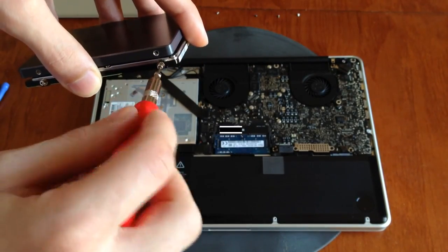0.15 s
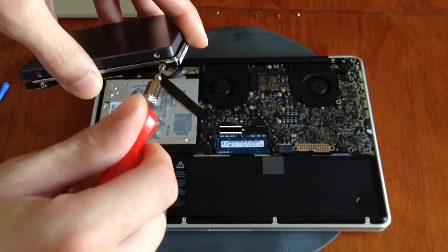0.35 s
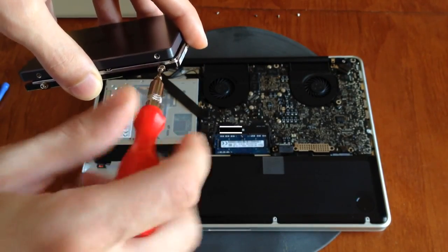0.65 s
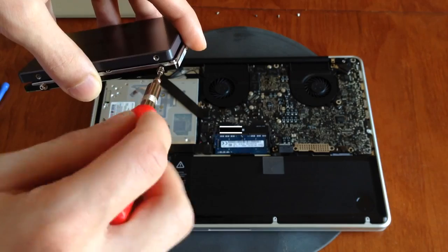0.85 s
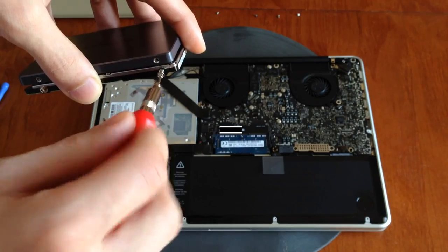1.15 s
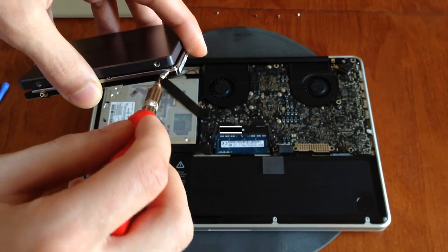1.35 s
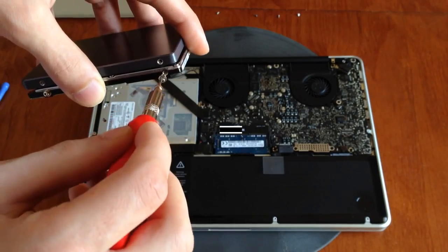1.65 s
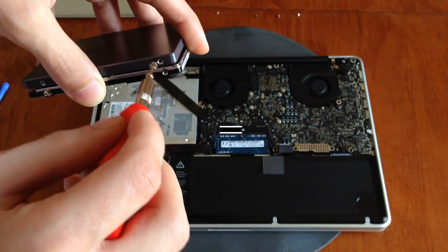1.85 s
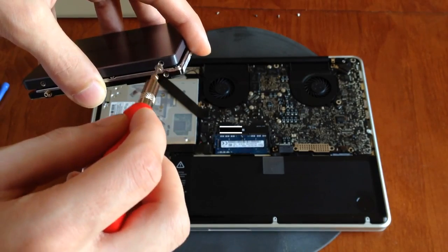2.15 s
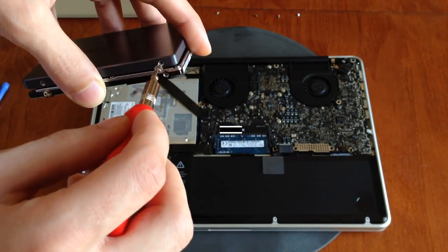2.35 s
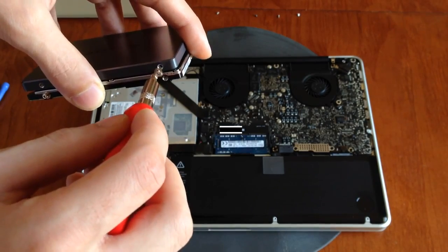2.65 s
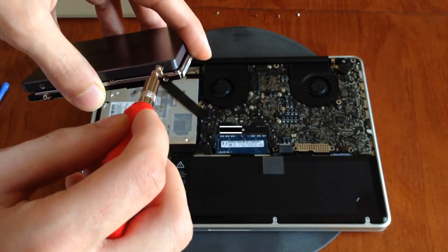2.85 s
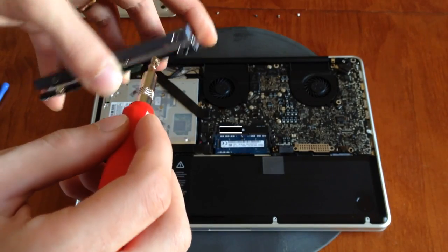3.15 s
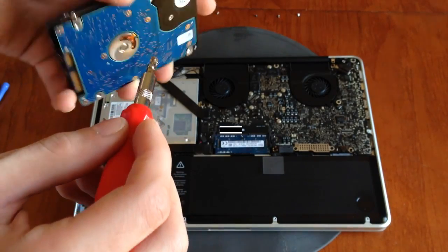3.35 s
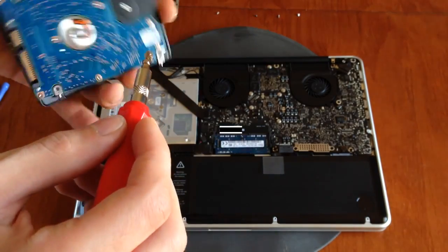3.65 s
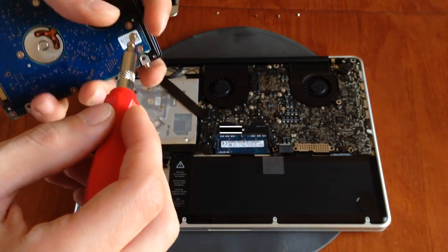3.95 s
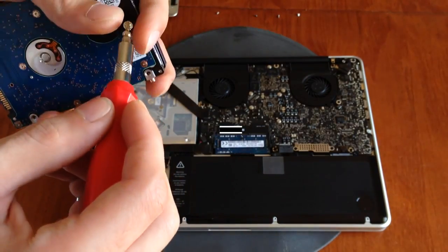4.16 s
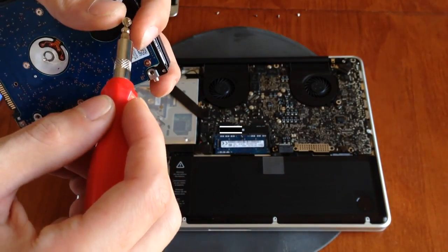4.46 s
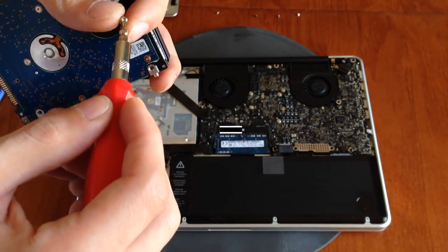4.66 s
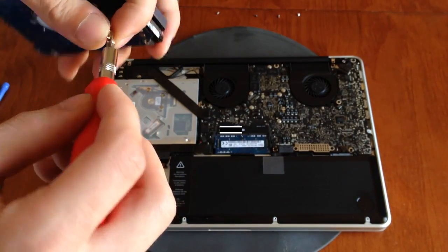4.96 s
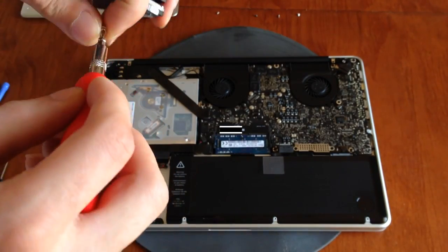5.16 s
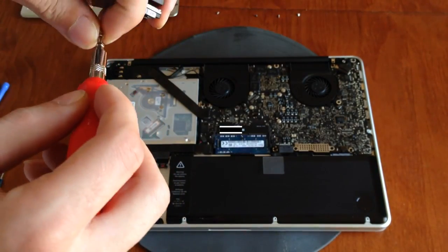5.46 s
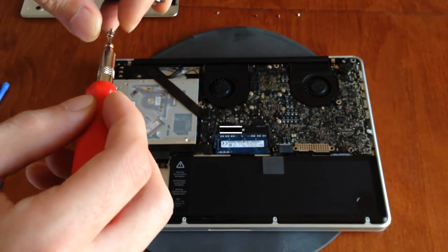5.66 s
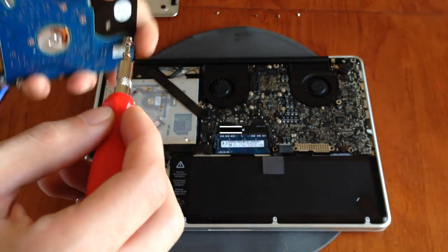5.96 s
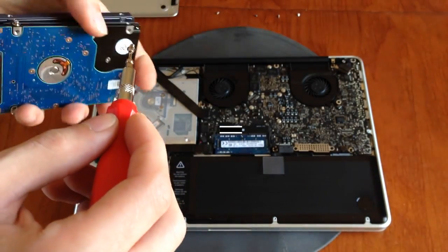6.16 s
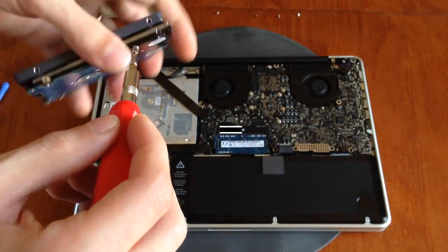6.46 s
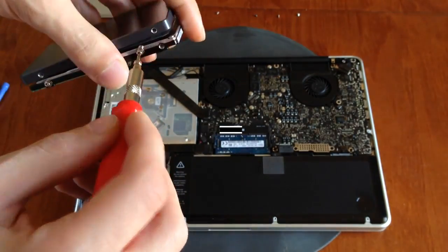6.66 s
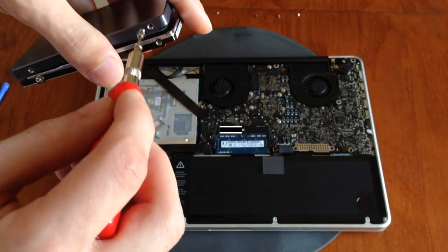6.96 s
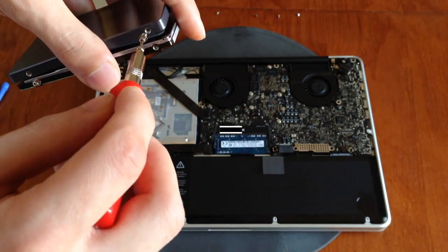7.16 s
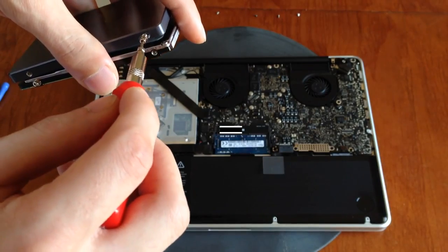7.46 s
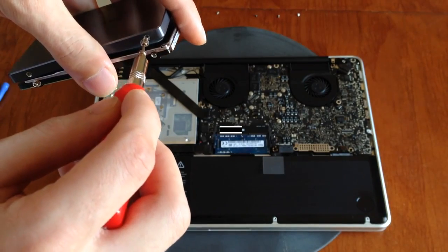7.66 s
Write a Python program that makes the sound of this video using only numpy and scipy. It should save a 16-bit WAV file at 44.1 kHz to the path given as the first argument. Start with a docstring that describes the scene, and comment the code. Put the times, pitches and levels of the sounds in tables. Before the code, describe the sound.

A quiet small room, heard close, with steady soft hiss and a faint wavering low hum throughout. From 0.1 to 0.9 seconds a screwdriver bit makes sparse, very faint steel ticks and a light tap on a hand-held metal drive. Between 1.2 and 1.45 the ticks bunch into a quick bright run, the clearest at 1.23, with slight gritty rubbing. Then almost only room noise, with barely audible ticks near 2.2 and 2.7. At 3.4 to 3.75 light knocks gather, bursting at 3.8 into a very loud, hard double clatter with short metallic ringing and a brief room tail. Softer contact follows at 3.9, then a sharp, bright knock at 4.02. A crisp tiny snap comes at 5.15, a faint knock at 6.0, a small ringing tap at 6.34 and a light click-knock at 6.64. Only hiss and hum remain to about 8.

```python
"""Unscrewing a hand-held hard drive

A small screwdriver backs mounting screws out of a laptop hard drive held in the hand, in a quiet room.
The steel bit ticks and slips, as filtered noise bursts; rough metal rubs, as strokes of random grains.
Knocks and one sharp clatter, as the drive is turned over, mix damped noise with ringing sine modes.
A short room tail of decaying noise follows each blow, over wavering hum lines and steady hiss."""
import sys
import numpy as np
from scipy import signal
from scipy.fft import rfft, irfft, next_fast_len
from scipy.io import wavfile

SR = 44100
rng = np.random.default_rng(int(sys.argv[2]) if len(sys.argv) > 2 else 0)


def dump_mix(stems):
    """Bounce the given channels to the path in sys.argv[1] as a 16-bit WAV at rate SR."""
    frames = np.atleast_2d(stems).T  # one column per channel
    limited = np.clip(frames, -1, 1)  # hard clip at full scale
    pcm = np.round(limited * 32767).astype(np.int16)
    wavfile.write(sys.argv[1], SR, pcm)


N = 344421  # length [samples]
BLOW_T = np.arange(12288) / SR  # time within one blow [s]


def amp(db):
    """Decibels to gain."""
    return 10 ** (np.asarray(db) / 20)


def unit(x):
    """Scales to an energy of one."""
    return x / np.sqrt(np.sum(x ** 2) + 1e-20)


def evened(x):
    """Scales to an rms of one."""
    return unit(x) * np.sqrt(len(x))


def read(points, hz):
    """Reads a table of (frequency, value) along a log-frequency axis."""
    f, value = np.transpose(points)
    return np.interp(np.log(hz + 1), np.log(f), value)


def add(mix, s, db, sound):
    """Places a blow; its level is the rms that its energy would have over 4 ms."""
    part = mix[round(s * SR):][:len(sound)]
    scaled = amp(db) * np.sqrt(.004 * SR) * unit(sound)
    part += scaled[:len(part)]


def colour(x, db_at):
    """Minimum-phase filter with the gain curve db_at(Hz), so that attacks stay sharp; energy of one."""
    hz = abs(np.fft.fftfreq(4096, 1 / SR))
    log_gain = np.log(amp(np.maximum(db_at(hz), -100)))
    # the Hilbert transform of the log gain gives the phase of a causal filter
    spectrum = np.exp(np.conj(signal.hilbert(log_gain)))
    taps = np.fft.ifft(spectrum).real[:2048]
    return unit(signal.fftconvolve(x, taps)[:len(x)])


def fade(t60):
    """Free decay of a vibration: 60 dB in t60 seconds."""
    return amp(-60 * BLOW_T / t60)


def burst(t60):
    """Many overlapping vibrations dying together, as decaying noise."""
    return unit(rng.standard_normal(len(BLOW_T)) * fade(t60))


def mode(hz, t60):
    """One struck resonance, as a decaying sine."""
    return np.sin(2 * np.pi * hz * BLOW_T) * fade(t60)


def drift(rate_hz):
    """Slow random motion of rms one."""
    knots = rng.standard_normal(400)
    return evened(np.interp(np.arange(N) * rate_hz / SR, np.arange(len(knots)), knots))


def tick_width(db, octaves=.66, ref_db=-48, octaves_per_db=.028):
    """Width in octaves of a tick of this strength: a stronger tick has a wider band."""
    return max(octaves + octaves_per_db * (db - ref_db), .1)


def screwdriver(snap=3, skirt_db=-17, ring_db=-15, ring_t60=.03, body_hz=1300):
    """Steel snaps against steel: one sharp release, a trail of tiny impacts and a brief ring of the bit."""
    # the bit catching in the screw head; long ones are slips:
    # (time [s], level [dB], centre [Hz], t60 of the trail [s])
    catches = [(.1431, -46.8, 4900, .002), (.5306, -53.5, 5730, .002), (.8165, -53, 6250, .002),
               (.8912, -48, 5800, .002), (.9114, -44.5, 8800, .004), (1.2006, -52.5, 6200, .003),
               (1.222, -46.5, 4200, .01), (1.233, -29, 6760, .004), (1.322, -47, 7950, .05),
               (1.346, -47, 6600, .03), (1.3662, -37.5, 6300, .006), (1.4393, -49, 7800, .04),
               (2.7376, -47.5, 6200, .028), (2.857, -55, 9500, .004), (4.822, -56, 7000, .005),
               (6.628, -39, 4300, .003)]
    # fingers pull the freed screw off the bit:
    # (time [s], level [dB], centre [Hz], t60 of the trail [s], width [octaves])
    pluck = (5.1517, -31.5, 8600, .001, .53)
    # resonances of bit and screw: (frequency [Hz], relative level [dB])
    bit = [(1000, 9), (2000, 0), (3000, -8), (4100, 4), (5100, 2), (5800, -0.5), (6700, 2), (8000, -5.5),
           (9700, -1), (11800, -6.5), (13800, 2)]

    out = np.zeros(N)
    snaps = [(s, db, hz, t60, tick_width(db)) for s, db, hz, t60 in catches]
    for s, db, centre_hz, t60, octaves in snaps + [pluck]:
        trail = rng.standard_normal(len(BLOW_T)) * fade(t60)
        release = unit(np.r_[snap, trail[1:]])  # the first sample is the sharp release
        contact = release + amp(ring_db) * burst(ring_t60)

        def gain_db(hz):
            # power in the main band, over a broad, weak skirt with little bass
            band = np.exp(-(np.log2((hz + 1) / centre_hz) / octaves) ** 2)
            skirt = amp(skirt_db) * hz / np.hypot(hz, body_hz) / (1 + hz / centre_hz)
            return read(bit, hz) + 10 * np.log10(band + skirt ** 2)

        add(out, s, db, colour(contact, gain_db))
    return out


def rubbing(grains_per_s=9000, spread_db=2.5, width_octaves=.85):
    """Tiny catches of rough metal swell and fade under each stroke."""
    # metal rubbing on metal: (start [s], length [s], rms level over that length [dB], centre [Hz])
    rubs = [(1.294, .16, -65, 5800), (1.421, .033, -54, 7200), (3.812, .082, -43, 8850)]

    out = np.zeros(N)
    for s, length, db, centre_hz in rubs:
        caught = rng.random(len(BLOW_T)) < grains_per_s / SR
        size, spread = rng.standard_normal((2, len(BLOW_T)))
        stroke = np.sin(np.pi * np.minimum(BLOW_T / length, 1))
        grains = caught * size * amp(spread_db * spread) * stroke

        def gain_db(hz):
            return -20 * np.log10(1 + (np.log2((hz + 1) / centre_hz) / width_octaves) ** 2)

        # add() counts energy over 4 ms, so a longer stroke needs more
        add(out, s, db + 10 * np.log10(length / .004), colour(grains, gain_db))
    return out


def blows(rebound_s=.004, hardness=.85, rebound_db=-4.5, rebound_db_per_db=.09, spot_wander=.12):
    """Every blow lands twice, the second time softer and weaker: (s, dB, corner Hz, spot Hz)."""
    # blows on the drive: (time [s], level ahead of the bass cut [dB],
    # hardness as a treble corner [Hz], pitch of the struck spot [Hz])
    knocks = [(.6349, -49.5, 5000, 1610), (.9112, -41, 1700, 1575), (1.233, -42, 2400, 1600),
              (1.346, -48.5, 2200, 1660), (1.366, -49, 2600, 1780), (2.222, -56, 2500, 1610),
              (3.412, -37.5, 2500, 1486), (3.46, -41, 3000, 2280), (3.4822, -33.5, 3300, 900),
              (3.705, -37.5, 3600, 1520), (3.731, -44, 6000, 2270), (3.7433, -31, 2900, 2300),
              (3.776, -20, 2800, 1850), (3.795, -19.5, 2600, 2100), (3.8055, -9.5, 7500, 1750),
              (3.815, -7.6, 4200, 1407), (3.8888, -19, 2500, 1190), (4.0199, -16.5, 9500, 1200),
              (4.1759, -45, 1900, 1600), (6.0217, -43.5, 1900, 1500), (6.3414, -33, 2600, 1413),
              (6.641, -40.5, 6500, 1510)]

    # a rebound lands beside the first spot, which shifts its pitch by a random share
    beside = 1 + spot_wander * rng.uniform(-1, 1, len(knocks))
    landings = []
    for (s, db, corner_hz, spot_hz), shift in zip(knocks, beside):
        landings.append((s, db, corner_hz, spot_hz))
        # rebound_db holds at full scale; light blows rebound less
        weaker_db = db + rebound_db + rebound_db_per_db * db
        landings.append((s + rebound_s, weaker_db, corner_hz * hardness, spot_hz * shift))
    return landings


def drive(crack_db=-5, crack_t60=.005, modes_db=-14, spot_t60=.055, rise_s=.0008, low_hz=620):
    """Each blow cracks, rattles the casing and rings the metal; soft contact weakens the treble."""
    # the dense, quickly damped ringing of the casing: (frequency [Hz], relative level [dB])
    casing_tone = [(100, -44), (300, -22), (600, -22), (850, -11), (1150, -2.5), (1600, .5), (2100, -1.5),
                   (2700, -5), (3200, -2.5), (4000, -6), (5500, -4), (7000, -4.5), (10000, -11.5),
                   (13500, -11), (15500, -18)]
    # the metal's longer modes: (frequency [Hz], relative level [dB], t60 [s])
    metal_modes = [(1168, -13, .1), (1347, -7, .07), (1418, -5, .08), (1490, -8.5, .15), (1566, -6.5, .18),
                   (1660, -5.5, 0.26), (1924, -6, 0.11), (2010, -7, .14), (2166, -6.5, .2),
                   (2360, -7, 0.19), (2610, -6.5, .12), (2842, -8.5, .12), (3100, -2.5, .13),
                   (3200, -3.5, 0.17), (3265, -5.5, .26), (3470, -9, .22), (3973, -10, .13),
                   (5110, -7.5, 0.17), (5370, -7.5, .17), (6008, -8.5, .16), (7192, -7.5, .15),
                   (7752, -6.5, .16), (8400, -8.5, .17)]
    usual_corner_hz = 3000
    casing_t60, t60_per_octave = .032, .7  # [s] at the usual hardness; factor for each octave harder
    usual_spot_db, spot_db_per_octave = -2, -4  # a harder blow rings the struck spot less

    out = np.zeros(N)
    contact = 1 - np.exp(-BLOW_T / rise_s)  # the vibration takes a moment to spread through the body
    rings = [mode(hz, t60) for hz, _, t60 in metal_modes]
    for s, db, corner_hz, spot_hz in blows():
        harder = np.log2(corner_hz / usual_corner_hz)  # [octaves]
        t60 = casing_t60 * t60_per_octave ** harder
        spot_db = usual_spot_db + spot_db_per_octave * harder

        def soft_db(hz):
            return -10 * np.log10(1 + (hz / corner_hz) ** 3)

        rattle = contact * (burst(t60) + amp(crack_db) * burst(crack_t60))
        casing = colour(rattle, lambda hz: read(casing_tone, hz) + soft_db(hz))

        # each mode answers with a random sign
        signs = rng.choice([-1, 1], len(metal_modes))
        metal = np.zeros(len(BLOW_T))
        for sign, ring, (hz, level, _) in zip(signs, rings, metal_modes):
            metal += sign * amp(level + soft_db(hz)) * ring

        spot = unit(mode(spot_hz, spot_t60))
        ringing = amp(modes_db) * unit(metal) + amp(spot_db) * spot
        add(out, s, db, casing + contact * ringing)
    # so small a body radiates little bass
    bass_cut = signal.butter(1, low_hz, "highpass", fs=SR, output="sos")
    return signal.sosfilt(bass_cut, out)


def clear_rings(linger_db=-11, linger_times=4):
    """Each ring is one clear note that dies quickly, with a thin part that lingers several times as long."""
    # clear metallic rings, several sounding with the knocks on the drive:
    # (time [s], level [dB], pitch [Hz], t60 of the quick part [s])
    notes = [(2.183, -57, 3450, .05), (2.705, -57, 3400, .06), (3.4822, -39, 4100, .018),
             (3.484, -39, 2270, .02), (3.705, -45, 4120, .03), (3.815, -18, 3140, .035),
             (4.022, -34, 3280, .07), (6.3416, -45, 3940, .04), (6.345, -32.3, 2200, .055),
             (6.643, -49, 3450, .05)]

    out = np.zeros(N)
    for s, db, hz, t60 in notes:
        quick = unit(mode(hz, t60))
        lingering = unit(mode(hz, linger_times * t60))
        add(out, s, db, quick + amp(linger_db) * lingering)
    return out


def room(x, early_db=-12.5, early_t60=.1, late_db=-19.0, delay_s=.005, scatter_hz=1300):
    """The desk and nearby small things scatter the shorter waves early; the walls add a faint tail."""
    # decay of the walls' tail: (frequency [Hz], t60 [s])
    wall_t60 = [(300, .35), (1500, 0.42), (4000, 0.44), (8000, 0.39), (15000, 0.12)]

    # noise that dies at its own rate in each frequency band
    hz, t, bands = signal.stft(rng.standard_normal(len(BLOW_T)), SR, nperseg=256)
    decay = amp(-60 * t / read(wall_t60, hz)[:, None])
    late = signal.istft(bands * decay, SR, nperseg=256)[1][:len(BLOW_T)]

    scatter = signal.butter(1, scatter_hz, "highpass", fs=SR, output="sos")
    early = signal.sosfilt(scatter, burst(early_t60))
    echoes = amp(early_db) * early + amp(late_db) * unit(late)
    return signal.oaconvolve(x, np.pad(echoes, (round(delay_s * SR), 0)))[:N]


def background(air_db=-58, waver=.5, waver_hz=12, wander_rad=.9):
    """Steady room noise and hiss, as shaped noise, with hum lines that waver in level and phase."""
    # spectrum of room noise and hiss: (frequency [Hz], relative level per Hz [dB])
    air_tone = [(20, -16), (60, -5), (80, -6.5), (100, -4), (165, -1.5), (200, -5.5), (260, -10.5),
                (350, -8.5), (480, -15.5), (720, -11.5), (1100, -12.5), (1700, -17), (2800, -21),
                (15000, -24.5)]
    # hum lines: (frequency [Hz], rms level [dB])
    hum_lines = [(61, -78.5), (98, -70.5), (122, -68.5), (158, -65), (343, -77.5), (1082, -83)]

    size, t = next_fast_len(N, True), np.arange(N) / SR
    spectrum = rfft(rng.standard_normal(size))
    shape = amp(read(air_tone, np.fft.rfftfreq(size, 1 / SR)))
    air = evened(irfft(spectrum * shape, size)[:N])

    hum = np.zeros(N)
    for hz, db in hum_lines:
        swell = 1 + waver * drift(waver_hz)
        phase = 2 * np.pi * hz * t + wander_rad * drift(waver_hz)
        hum += amp(db) * evened(swell * np.sin(phase))
    return amp(air_db) * air + hum


def scene(tick_room_db=-2.0):
    """Screwdriver and drive, close by, in the room; the ticks feed the room a little less."""
    ticks = screwdriver() + rubbing()
    knocks = drive() + clear_rings()
    tail = room(knocks + amp(tick_room_db) * ticks)
    return (ticks + knocks + tail + background())[None]


def record(dry, edge_hz=15400):
    """Full-scale limit, then the band limit."""
    lowpass = signal.firwin(301, edge_hz, window=("kaiser", 8), fs=SR)
    return signal.oaconvolve(np.clip(dry, -1, 1), lowpass[None], "same")


dry = scene()
out = record(dry)
dump_mix(out)
```